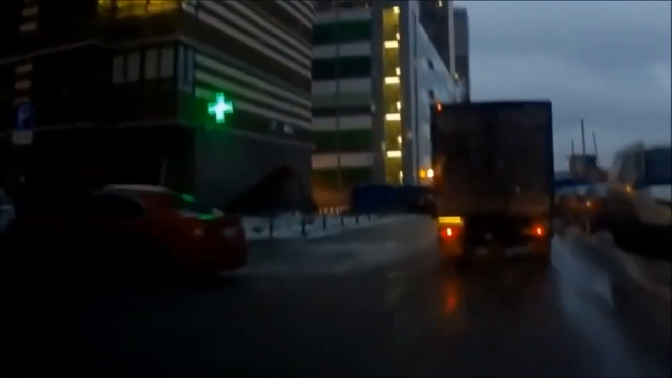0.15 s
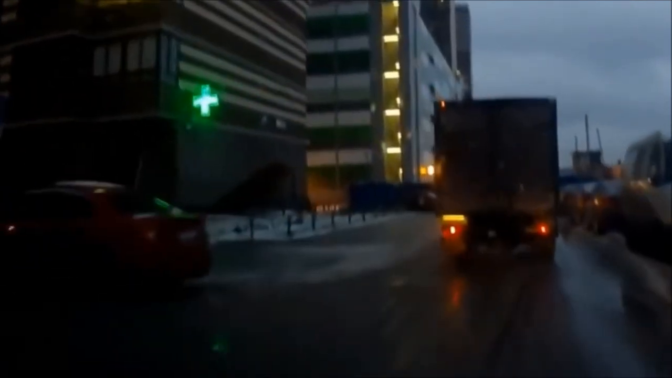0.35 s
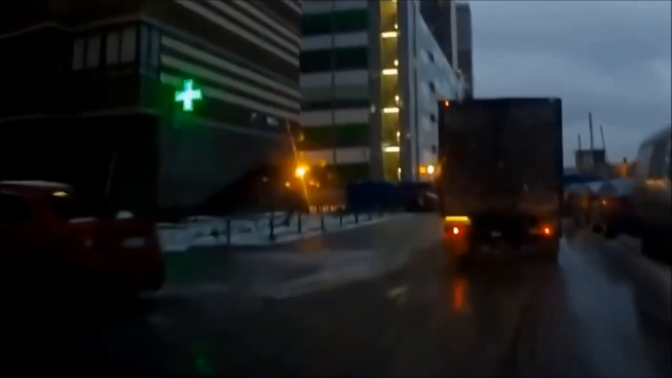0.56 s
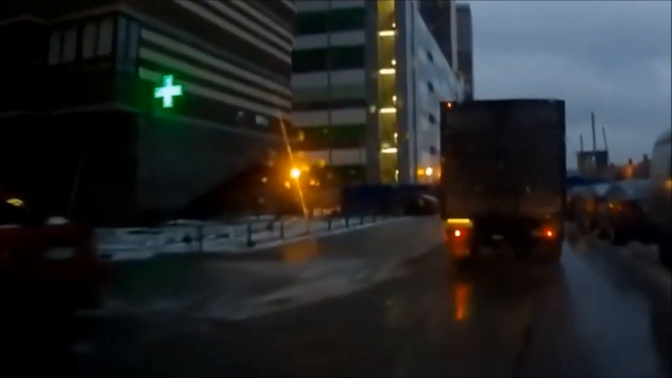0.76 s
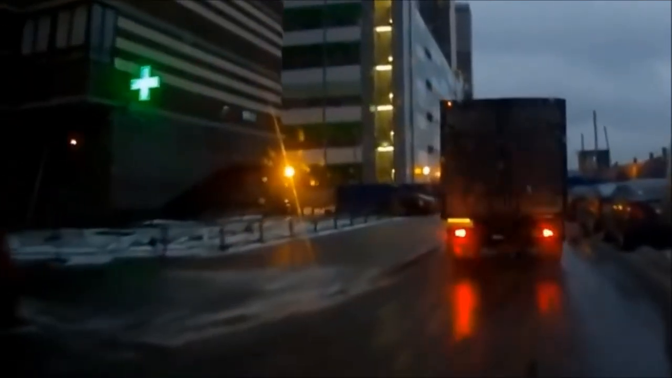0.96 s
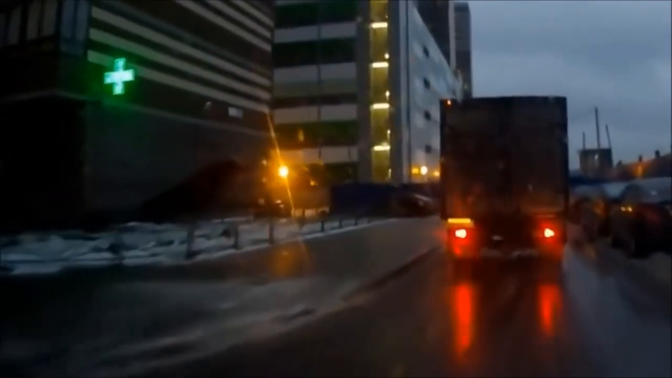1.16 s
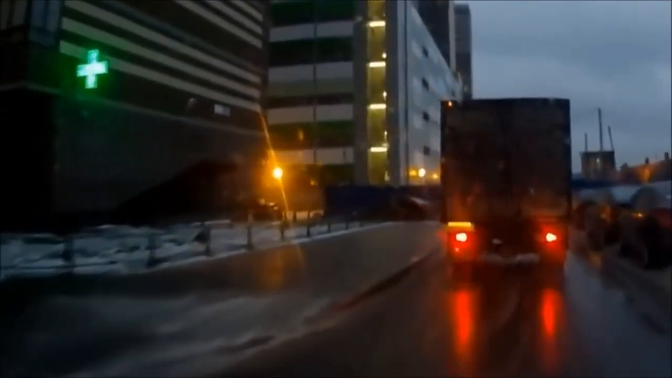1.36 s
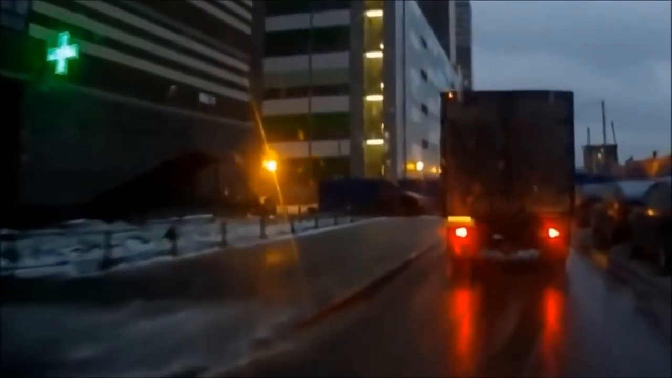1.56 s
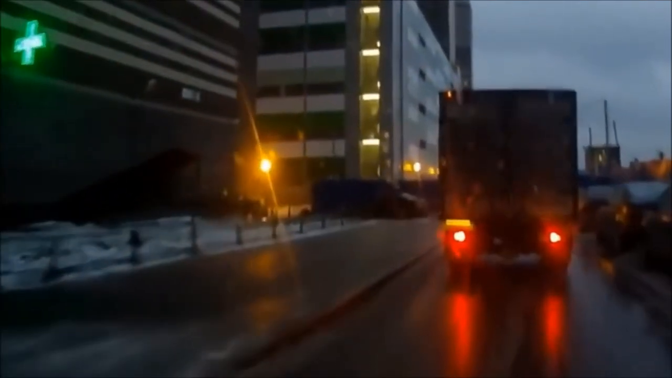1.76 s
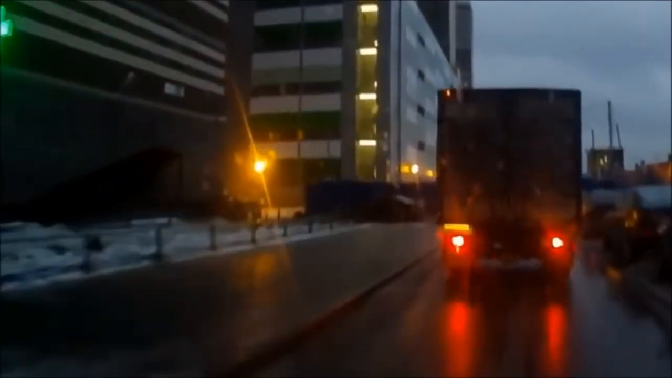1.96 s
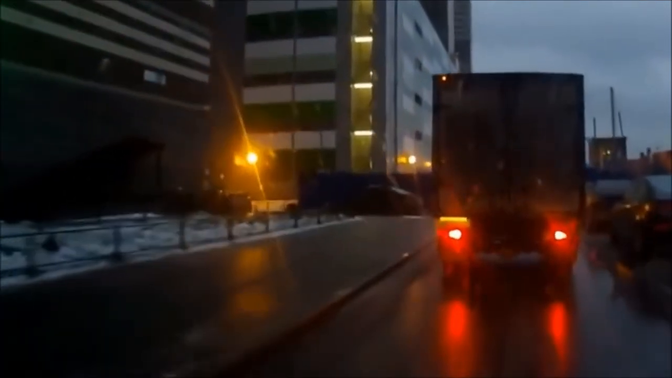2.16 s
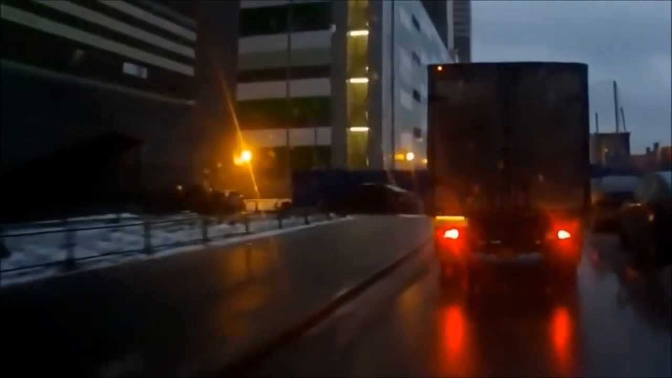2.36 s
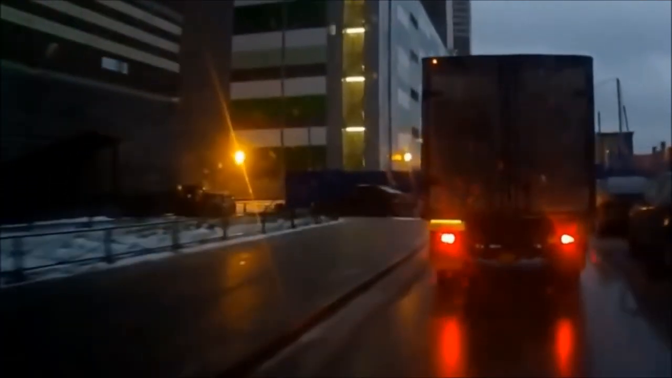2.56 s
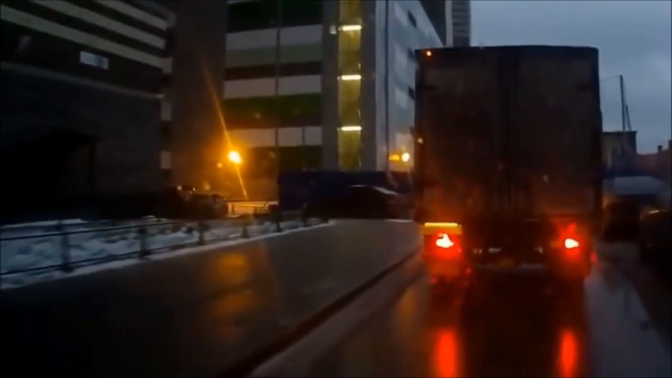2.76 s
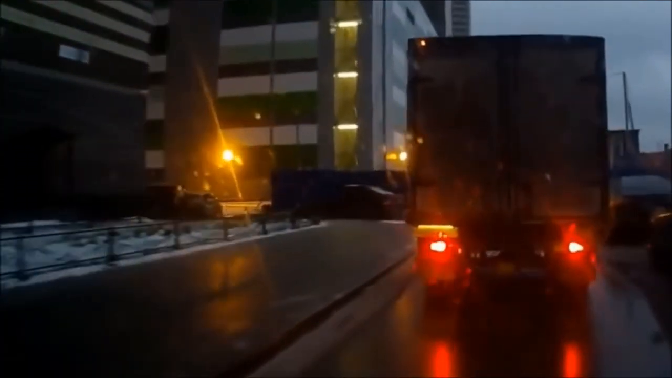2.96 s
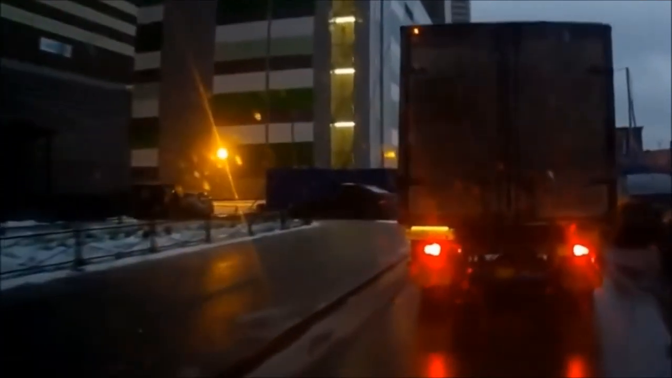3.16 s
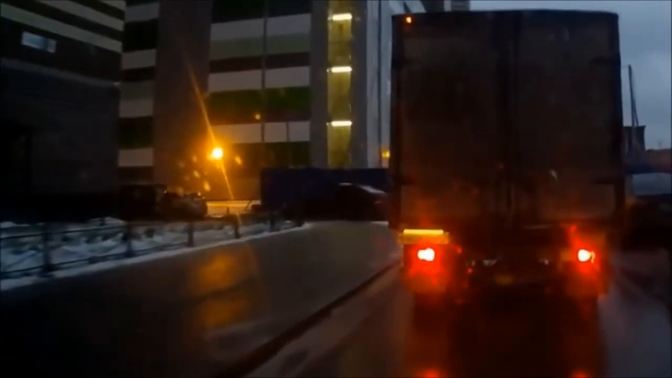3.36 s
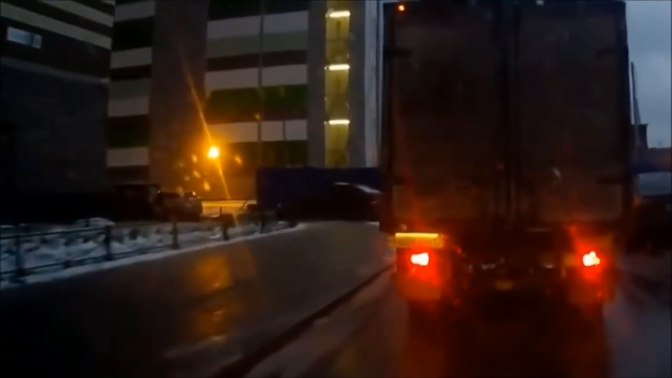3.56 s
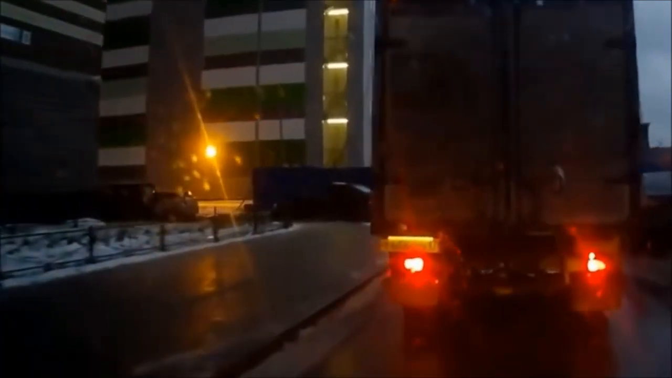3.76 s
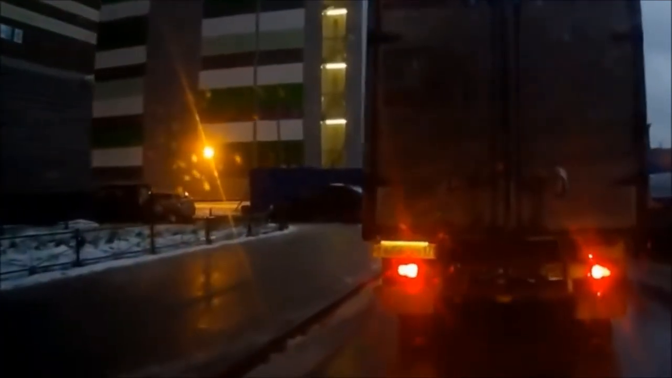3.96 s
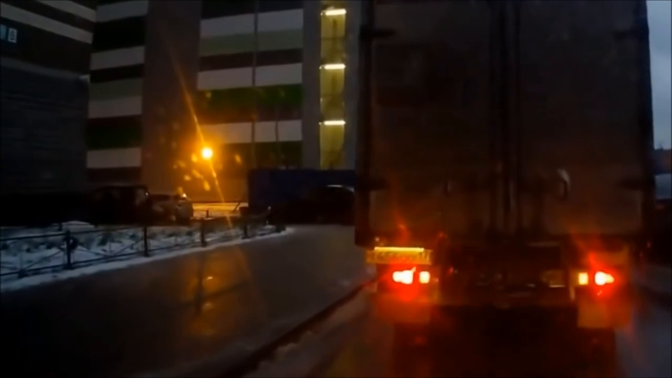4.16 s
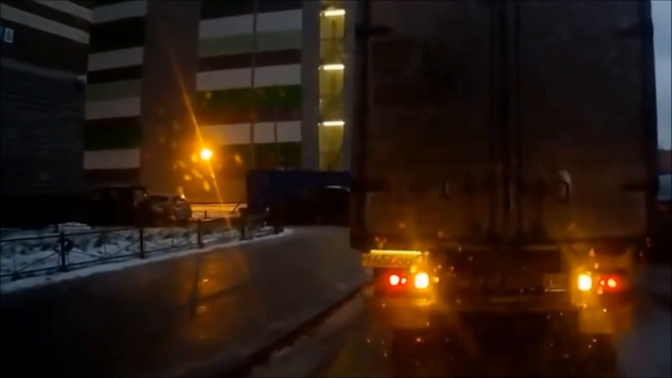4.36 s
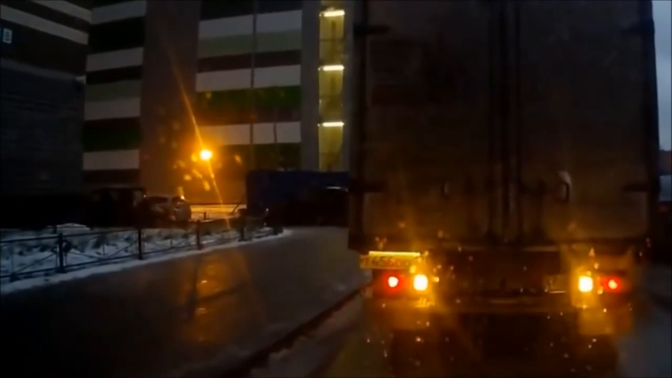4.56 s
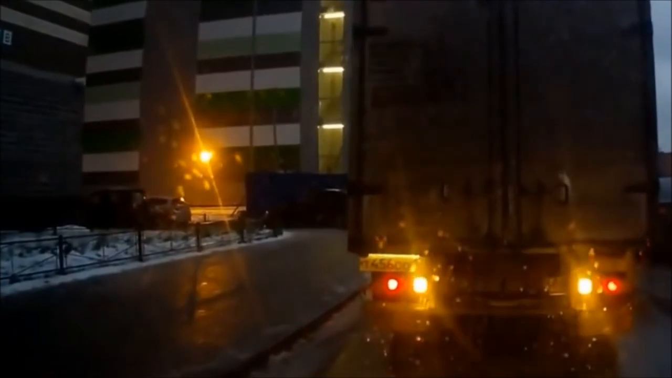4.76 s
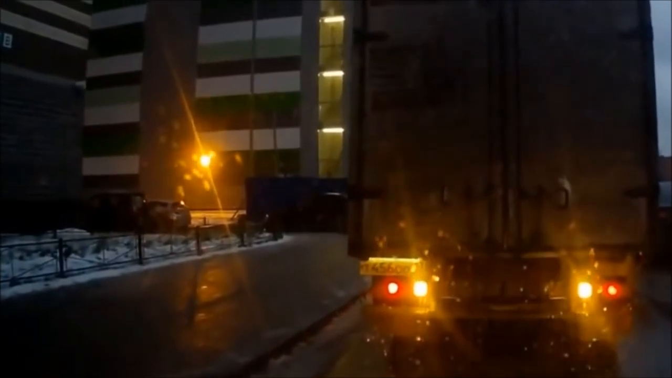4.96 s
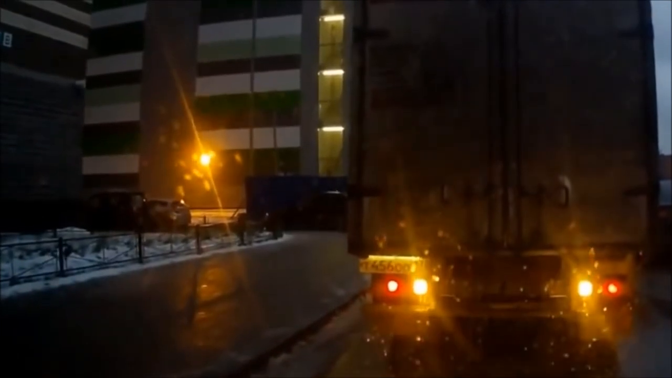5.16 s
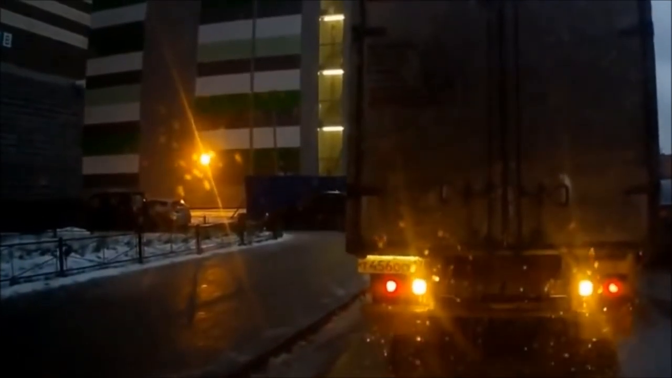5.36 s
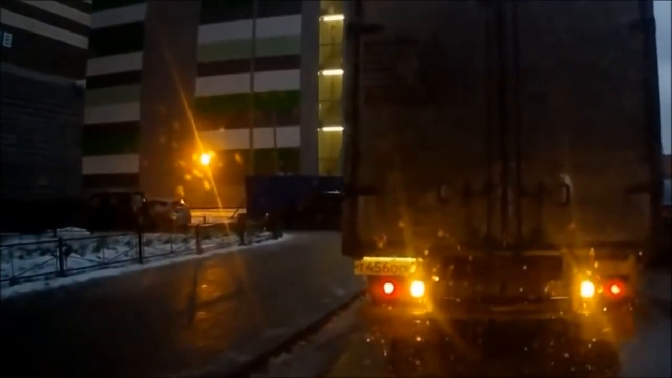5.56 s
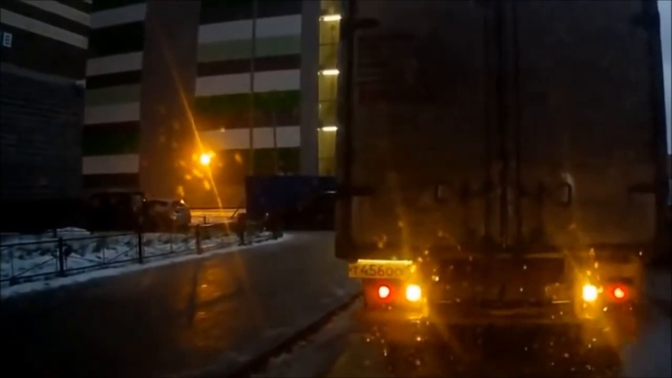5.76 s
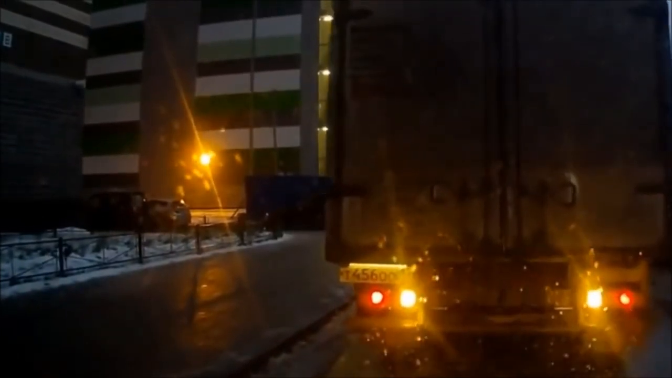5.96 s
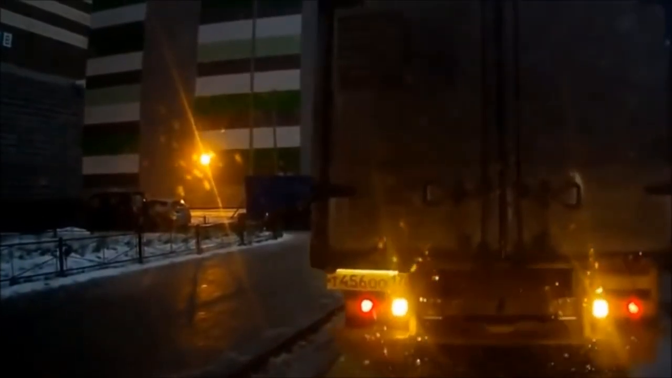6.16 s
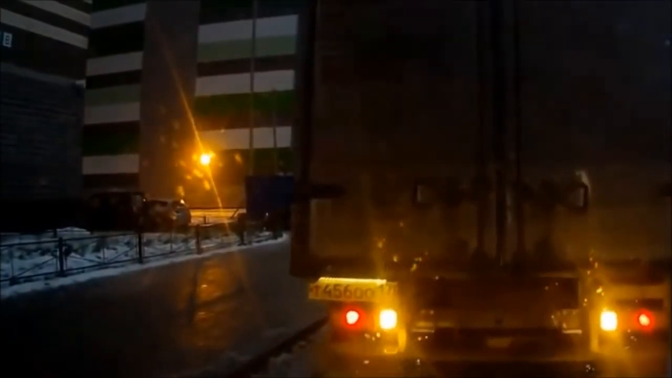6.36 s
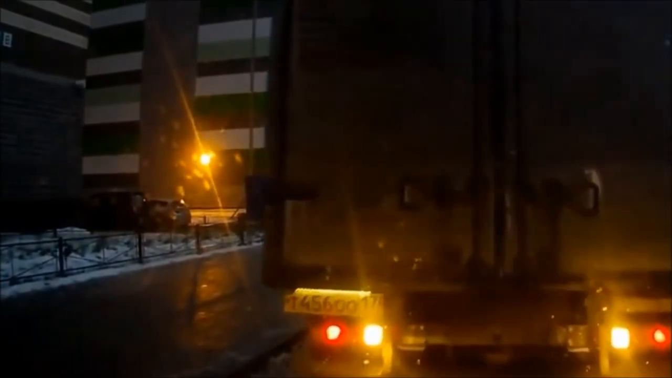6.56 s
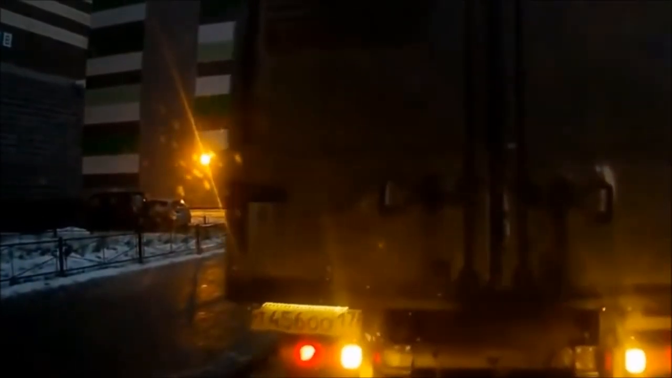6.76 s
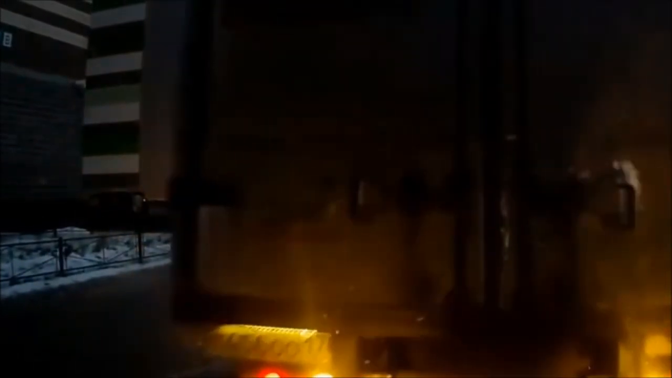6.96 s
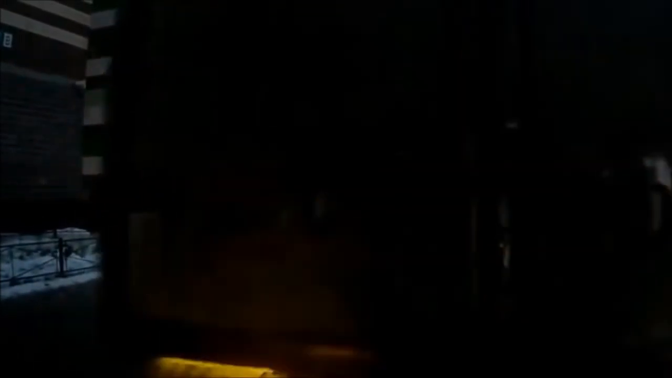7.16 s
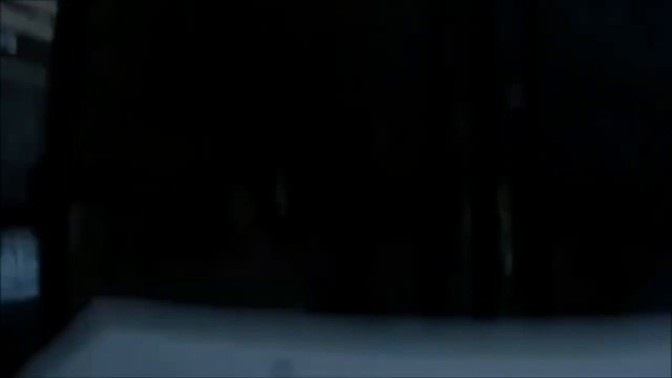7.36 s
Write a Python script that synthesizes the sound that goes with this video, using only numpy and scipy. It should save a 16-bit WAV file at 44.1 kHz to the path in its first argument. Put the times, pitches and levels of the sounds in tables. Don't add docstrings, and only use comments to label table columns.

```python
import sys
import numpy as np
from scipy import signal
from scipy.fft import rfft, irfft, next_fast_len
from scipy.io import wavfile
from scipy.ndimage import uniform_filter1d

SR = 44100
rng = np.random.default_rng(int(sys.argv[2]) if len(sys.argv) > 2 else 0)


def amplitude_ratio(level_db):
    exponent = np.asarray(level_db, float) / 20
    return 10 ** exponent


def bounce(signal):
    frames = np.transpose(np.atleast_2d(signal))
    limited = np.clip(frames, -1, 1)
    pcm = np.round(limited * 32767).astype(np.int16)
    wavfile.write(sys.argv[1], SR, pcm)


N = 326163
TIME = np.arange(N) / SR
CRUISE_M_S = 8

# time in seconds, speed in m/s.
SPEED = [(0, 6.9), (.4, 8), (1.0, 8.27), (1.65, 7.9), (2.05, 7.6), (2.8, 6.67), (3.15, 5.5), (3.5, 4),
         (4.0, 2.6), (4.4, 0.9), (4.7, 0.064)]
# time in seconds, swell in dB.
NEAR = [
    (4.5, 0),
    (4.9, 2.5),
    (5.3, 3),
    (5.8, 5.5),
    (6.35, 1),
    (6.6, 8.5),
    (6.8, 10),
    (7.03, 8.5),
    (7.23, 11),
]
# start in seconds, level in dB, frequency in Hz, 60 dB decay in seconds.
POTHOLE = [
    (1.862, 2, 20.3, .95),
    (1.881, -15, 62, 1.1),
]


def curves(table):
    s, *columns = np.transpose(table)
    return [np.interp(TIME, s, column) for column in columns]


def colour(points):
    hz, db = np.transpose(points)
    size = next_fast_len(N, True)
    f = np.arange(size // 2 + 1) * SR / size + 1
    gain = amplitude_ratio(np.interp(np.log(f), np.log(hz), db, left=-120, right=-120))
    white = np.resize(rng.standard_normal(N), size)
    y = irfft(rfft(white) * gain, size)[:N]
    return y / y.std()


def ring(x, hz, width_hz):
    return signal.lfilter(*signal.iirpeak(hz, hz / width_hz, fs=SR), x)


def walk(rate):
    k = int(SR / rate)
    held = np.repeat(rng.standard_normal(N // k + 1), k)
    return 1.295 * uniform_filter1d(uniform_filter1d(held, k), k)[:N]


def tone(hz, db, turns=0.):
    return np.sqrt(2) * amplitude_ratio(db) * np.sin(2 * np.pi * (np.cumsum(hz) / SR + turns))


def burst(s, rise_ms, t60_ms):
    out = np.zeros(N)
    span = slice(*np.searchsorted(TIME, [s, s + t60_ms / 500]))
    t = (TIME[span] - s) * 1000
    out[span] = (1 - np.exp(-t / rise_ms)) * np.exp(-np.log(1000) * t / t60_ms)
    return out


def knock(s, db, hz, rise_ms, t60):
    return amplitude_ratio(db) * burst(s, rise_ms, 1000 * t60) * np.sin(2 * np.pi * hz * (TIME - s))


def loudness(cruise_db, power, rest_db, share):
    rolling = amplitude_ratio(cruise_db) * (curves(SPEED)[0] / CRUISE_M_S) ** power
    return np.hypot(rolling, amplitude_ratio(rest_db + share * curves(NEAR)[0]))


def whine():
    # frequency in Hz, level in dB, time between loads in seconds, dip in Hz.
    camera_supply = (8550, -88.5, .535, 130)
    # time in seconds, lowering in Hz.
    long_load = [(4.76, 0), (4.83, 100), (5.3, 90), (5.45, 0)]
    hz, db, period, dip_hz = camera_supply
    since = (TIME + .03) % period
    hz = hz - dip_hz * np.exp(-since / .05) - curves(long_load)[0] + 22 * walk(150)
    return tone(hz, db + 2.5 * walk(40))


def air():
    # frequency in Hz, density in dB per Hz.
    air_spectrum = [(2650, -14.5), (4500, -0.5), (5500, -2.5), (7000, -5), (9000, -6.5), (11000, -9),
                    (12700, -8.5), (12900, -36)]
    opening = uniform_filter1d(1. * (walk(32) > .8), size=1200)
    patches = opening * colour([(12700, 0), (14000, -3), (15000, -9)])
    return amplitude_ratio(-74.5) * (colour(air_spectrum) + amplitude_ratio(-17.5) * patches)


def road():
    # frequency in Hz, density in dB per Hz.
    shake = [(3, -15.5), (10, 0), (20, -2), (40, -8), (60, -6.5), (90, -8), (130, -20)]
    rumble = [(55, -23), (70, -14), (90, -8), (115, -1), (135, -2.5), (160, -5), (190, -12.5), (240, -18),
              (300, -26), (390, -44)]
    drone = [(120, -20.5), (200, -5.5), (241, -3.5), (328, -10.5), (383, -6), (445, -10), (914, -19.5),
             (1060, -31), (1150, -24), (1300, -40.5), (1690, -59.5), (2860, -120)]
    spray = [(530, -31.5), (900, -2), (1320, -1), (1580, -4.5), (1910, -3.5), (2400, -3.5), (2800, -5.5),
             (3060, -6.5), (3910, -6), (4600, -11.5), (5250, -17), (7000, -36.5), (10000, -46.5)]
    # frequency in Hz, width in Hz, lift in dB.
    cabin = [(1576, 85, 6), (2767, 230, 6.5), (3470, 62, 5), (3780, 100, 3)]
    # level in dB, frequency in Hz, width in Hz.
    truck_fan = (-73.5, 3750, 2200)
    hiss = colour(spray)
    hiss = hiss + sum((amplitude_ratio(db) - 1) * ring(hiss, hz, width) for hz, width, db in cabin)
    out = loudness(cruise_db=-30.5, power=1.5, rest_db=-39.5, share=0.57) * colour(shake)
    rumble_gain = loudness(cruise_db=-40.5, power=1.2, rest_db=-48.5, share=-0.05)
    out = out + rumble_gain * amplitude_ratio(walk(15)) * colour(rumble)
    drone_gain = loudness(cruise_db=-49, power=.7, rest_db=-54.5, share=0.21)
    drone_gain = drone_gain * (1 + 2.4 * burst(POTHOLE[0][0], 72, 730))
    out = out + drone_gain * amplitude_ratio(1.26 * walk(10)) * colour(drone)
    spray_gain = loudness(cruise_db=-57, power=1.88, rest_db=-72, share=0.79)
    out = out + spray_gain * amplitude_ratio(0.4 * walk(6.7)) * hiss
    fan_db, fan_hz, fan_width = truck_fan
    return out + amplitude_ratio(fan_db + curves(NEAR)[0]) * ring(np.roll(hiss, SR), fan_hz, fan_width)


def body():
    # frequency in Hz, level at cruise in dB, power of speed, wobble as a share.
    panels = [(22, -29, .2, 0.066), (32.9, -30, 0.18, 0.116), (55.85, -31.5, .25, 0.101),
              (80.4, -34.5, .8, 0.0805)]
    # start in seconds, level in dB, frequency in Hz, 60 dB decay in seconds.
    bumps = [(-.05, -2.5, 22, 0.42), (.07, -15.5, 37.3, 0.68), (0.129, -18, 77, 0.68),
             (0.381, -20.5, 38, 0.9), (0.402, -22, 72, 0.45), (.43, -17, 79, 0.75), (.6, -18, 79, 0.68),
             (.8, -18.5, 82, 0.79), (.95, -19.5, 79, 1.03), (1.081, -17.5, 36, 0.98),
             (1.28, -18, 19.5, 1.3), (1.379, -19, 81, 0.52), (1.481, -16, 60, 0.86),
             (1.567, -4.5, 20.3, 0.77), (1.741, -15, 38, 0.66), (2.258, -25, 52, .4),
             (2.622, -24.5, 46.4, 1.6), (2.901, -21.5, 35, 1.3), (3.0, -27, 92, 0.85),
             (3.241, -22, 84, 0.65), (3.759, -16.5, 39, 1.4), (3.979, -20, 46, 0.76), (4.019, -15, 24.7, 1)]
    # start in seconds, peak in dB, frequency in Hz, 60 dB decay in seconds.
    jolts = [
        (4.792, -22.5, 9, 0.63),
        (6.674, -18, 62, 0.81),
        (6.681, -20, 134, 0.12),
    ]
    rolling = np.clip((4.3 - TIME) / 0.72, 0, 1)
    pace = curves(SPEED)[0] / CRUISE_M_S
    out = 0
    for hz, db, power, wobble in panels:
        swaying_hz = hz * (1 + wobble * walk(28))
        out = out + rolling * pace ** power * tone(swaying_hz, db + 30 * wobble * walk(23.91))
    for s, db, hz, t60 in bumps + POTHOLE:
        out = out + knock(s, db, hz, 1000 * 1.55 / hz, t60)
    for s, db, hz, t60 in jolts:
        out = out + knock(s, db, hz, 3.9, t60)
    return out


def engine():
    # time in seconds, cycle rate in Hz, level in dB.
    idle = [
        (3.2, 6.5, -62),
        (3.8, 6.3, -30),
        (4.4, 6.3, -29),
        (4.9, 5.68, -25.5),
        (5.5, 5.95, -28),
        (6, 6.25, -27.5),
        (6.5, 6, -28),
        (6.9, 5.5, -25.5),
        (7.4, 5.95, -31),
    ]
    # multiple of the cycle rate, level in dB.
    orders = [(2, -9), (3, -11.5), (4, 0.5), (5, -10.5), (6, -14), (7, -3), (8, -0.5), (9, -3.5), (10, -25),
              (11, -16.5), (13, -33)]
    hz, level_db = curves(idle)
    out = 0
    for k, db in orders:
        order_db = level_db - 6 + db + 0.93 * walk(2.9)
        out = out + tone(k * hz + 0.92 * walk(5), order_db, rng.random())
    return out


def truck():
    # time in seconds, frequency in Hz, level in dB.
    exhaust = [
        (4.6, 104, -70),
        (5.38, 105, -60),
        (5.48, 106, -44),
        (5.85, 105, -45),
        (6.0, 103, -60),
        (7.2, 105, -70),
    ]
    hz, db = curves(exhaust)
    return tone(hz * (1 + .015 * walk(12)), db + 1.5 * walk(10))


def trim():
    # start in seconds, peak in dB, ring in Hz, rise in ms, 60 dB decay in ms.
    ticks = [(1.04, -59.5, 4300, 3.9, 77), (1.98, -40.5, 800, 2.5, 38), (2.006, -41, 796, 2.1, 43),
             (2.093, -44.5, 3780, 2.7, 39), (2.097, -59, 6060, 1.7, 30), (2.746, -57, 4450, 1.7, 35),
             (3.484, -52, 1088, 1.8, 50), (3.796, -57, 3250, 1.6, 33), (4.79, -57, 1060, 3, 66),
             (5.224, -60, 3920, 2, 48), (5.548, -54, 2800, 10, 41), (5.67, -59, 3480, 4.9, 87),
             (6.033, -46, 397, 6.4, 100), (6.11, -51, 390, 3, 90), (6.52, -53, 3540, 6.5, 41),
             (7.163, -58.5, 3880, 6.6, 270), (7.222, -47, 3700, 5, 31)]
    noise = rng.standard_normal(N)
    out = 0
    for s, db, hz, rise, t60 in ticks:
        grain = ring(ring(noise, hz, 0.64 * hz), hz, 0.64 * hz)
        grain = ring(grain, hz, 0.9 * hz) * np.sqrt(4000 / hz)
        out = out + amplitude_ratio(db + 14.0) * burst(s, rise, t60) * grain
    return out


def gear_lever():
    # start in seconds, peak in dB, ring in Hz, rise in ms, 60 dB decay in ms.
    lever_knocks = [(6.62, -41, 3240, 60, 406), (6.674, -27.5, 3020, 1.9, 60.5),
                    (6.679, -17, 4260, 1.7, 46.1), (6.691, -25.5, 1770, 1.3, 76.4),
                    (6.705, -58, 2650, 3, 40), (6.72, -41.5, 4000, 4.9, 90.4),
                    (6.755, -33.5, 4160, 2.4, 49.7), (6.773, -46, 2840, 3.9, 40.1),
                    (6.839, -36.5, 3100, 9.3, 91.5), (6.875, -46, 3790, 8.9, 91.4),
                    (6.9, -46, 3010, 6, 69.7)]
    # frequency in Hz, density in dB per Hz.
    gate_spectrum = [(120, -23), (200, -6), (293, -8.5), (558, -4), (950, -18.5), (1270, -10), (1490, -23),
                     (1810, -12), (2250, -21.5), (2690, -11.5), (3080, -17), (4300, -9), (5250, -25),
                     (15200, -49)]
    gate = colour(gate_spectrum)
    out = 0
    for s, db, hz, rise, t60 in lever_knocks:
        out = out + amplitude_ratio(db - 3.5) * burst(s, rise, t60) * (gate + 0.72 * ring(gate, hz, 0.15 * hz))
    return out


def tearing():
    # start in seconds, peak in dB, length in ms, brightness in dB.
    tears = [(7.245, -16.5, 6.4, -42), (7.252, -14.5, 9.4, -16), (7.264, -11.5, 3, 3), (7.27, 2.5, 3.4, -7),
             (7.273, -1, 9.8, -3), (7.2881, -4, 4.4, 3.5), (7.2982, -4.5, 2.4, -11),
             (7.308, -14.5, 5.9, -10), (7.313, -11, 7.3, -11.5), (7.32, -9, 5.5, -5),
             (7.331, -21.5, 3, -7.5), (7.341, -5.5, 5.4, 5), (7.3456, -3, 3.8, 2), (7.35, -2.5, 3, 4),
             (7.367, 1.5, 1.1, 4), (7.3691, -8, 1.5, 9), (7.3678, 2.5, 3.1, -1), (7.373, -1, 3, 3.5),
             (7.385, -7, 4.5, 3)]
    # frequency in Hz, density in dB per Hz.
    metal = [(88, -14.5), (150, 1), (330, -13.5), (550, -3.5), (880, -14), (1550, -29.5), (3620, -25.5),
             (5250, -41.5), (8000, -47.5), (12000, -53), (15300, -64)]
    dull = colour(metal)
    bright = signal.lfilter(*signal.butter(1, 2500, "high", fs=SR), dull) * 1.65
    out = amplitude_ratio(-26.5) * np.clip((TIME - 7.25) / 0.012, 0, 1) * (dull + 1.1 * bright)
    for s, db, ms, bright_db in tears:
        shape = np.sin(np.pi * np.clip((TIME - s) * 1000 / ms, 0, 1)) ** .7
        out += amplitude_ratio(db - 11.5) * shape * (dull + amplitude_ratio(bright_db) * bright)
    return out


def pressure():
    # start in seconds, pressure (positive squeezes, negative releases).
    shoves = [(7.2412, .55), (7.2438, -.15), (7.246, .6), (7.2515, -.2), (7.2543, .55), (7.2603, -.55),
              (7.2645, -.18), (7.2668, -.5), (7.269, .6), (7.2762, .1), (7.278, -.45), (7.281, .6),
              (7.2826, -.5), (7.2878, -.12), (7.292, -.5), (7.3005, .75), (7.3088, -.5), (7.312, -.25),
              (7.3175, -.45), (7.3238, .75), (7.3336, -.6), (7.342, .4), (7.3445, -.4), (7.3482, .65),
              (7.3533, -1.2), (7.3652, -.38), (7.3738, .7), (7.3882, -.7)]
    s, push = np.transpose(shoves)
    out = amplitude_ratio(0.06) * np.append(0, push)[np.searchsorted(s, TIME)]
    return uniform_filter1d(uniform_filter1d(out, size=36), size=36)


def scene():
    mid = whine() + air() + road() + body() + engine() + truck()
    mid = mid + trim() + gear_lever() + tearing() + pressure()
    return np.array([mid, mid])


def band_limit(x):
    return signal.sosfilt(signal.butter(12, 15140, fs=SR, output="sos"), x)


def record(dry):
    overload = .305
    flat = dry / (1 + np.abs(dry / overload) ** 9) ** (1 / 9)
    leak = signal.lfilter(*signal.butter(1, 600, "high", fs=SR), dry - flat)
    flat = flat + 0.053 * np.tanh(4.3 * leak)
    treble = signal.lfilter(*signal.butter(2, 300, "high", fs=SR), flat[0])
    excess = uniform_filter1d(np.maximum(treble ** 2 - 1e-4, 0), size=900)
    grain = np.sqrt(excess + amplitude_ratio(-76)) * colour([
        (20, 30.5), (125, -23), (250, -8), (800, -8.5), (1000, -35.5), (4000, -31.5),
        (5500, -26.5), (9000, -31.5), (13000, -42.5)])
    flat = flat + amplitude_ratio(-18) * grain * amplitude_ratio(1.4 * walk(14)) * np.array([[1], [-1]])
    return band_limit(flat)


dry = scene()
out = record(dry)
bounce(out)
```